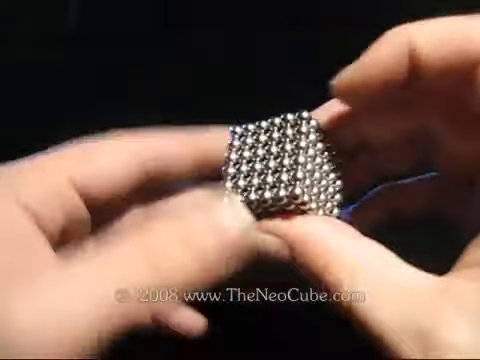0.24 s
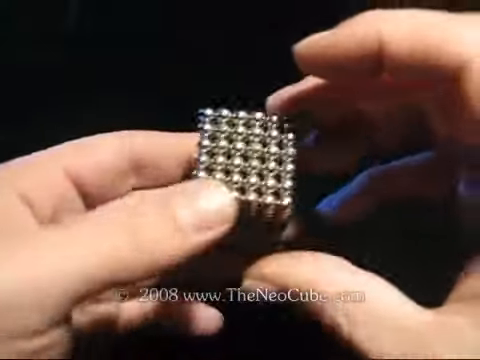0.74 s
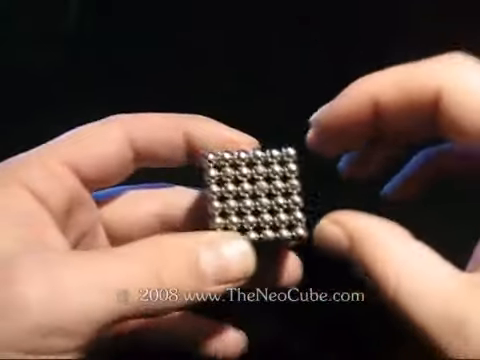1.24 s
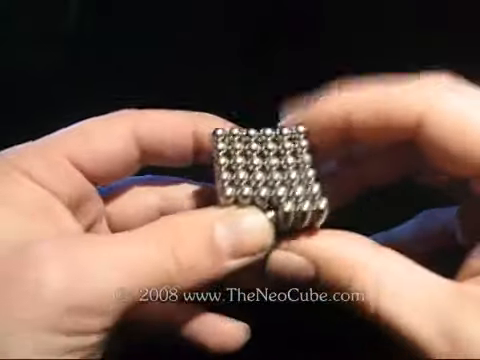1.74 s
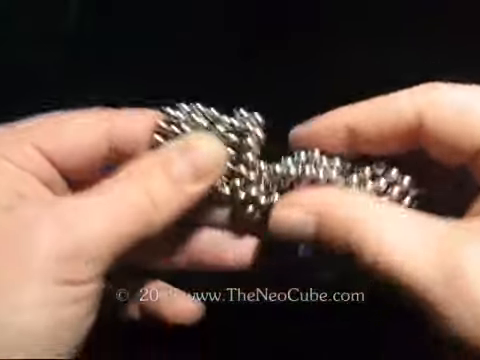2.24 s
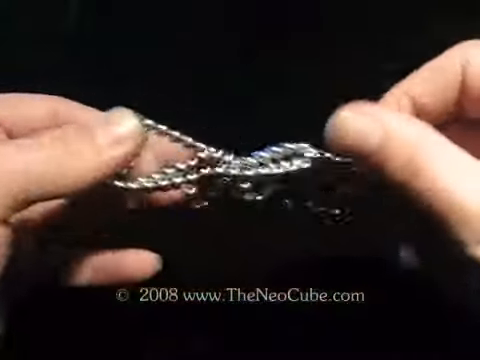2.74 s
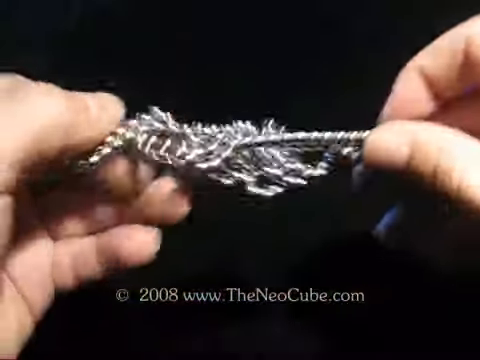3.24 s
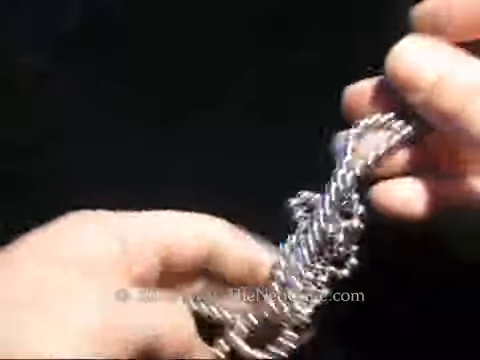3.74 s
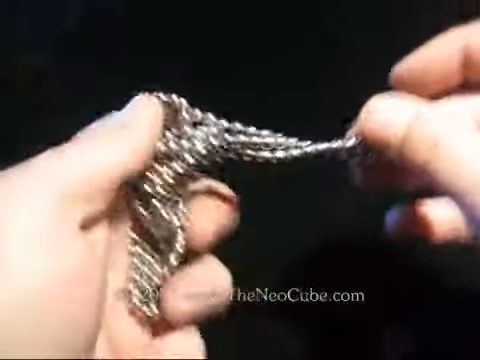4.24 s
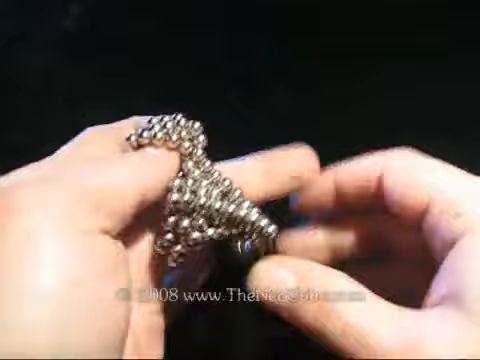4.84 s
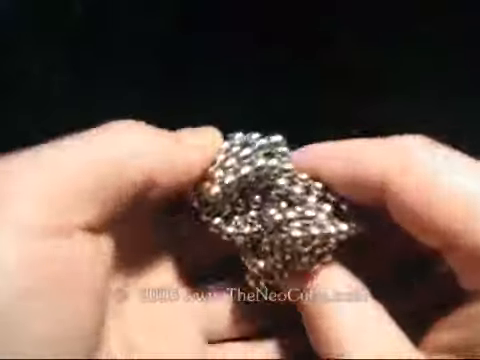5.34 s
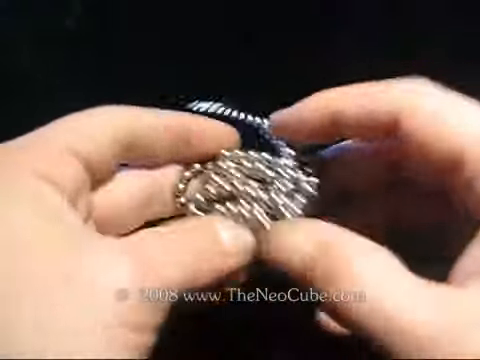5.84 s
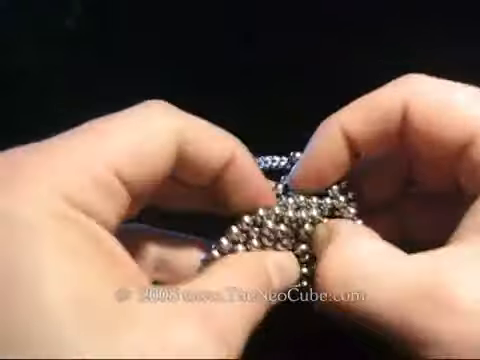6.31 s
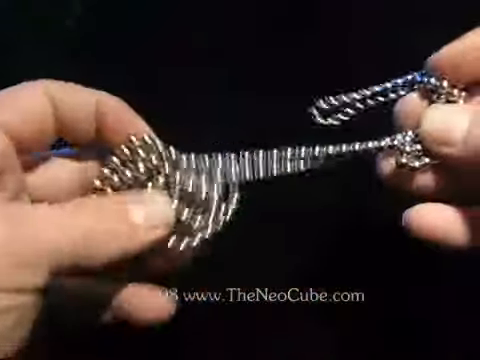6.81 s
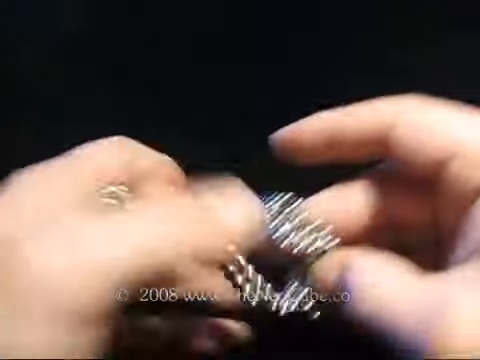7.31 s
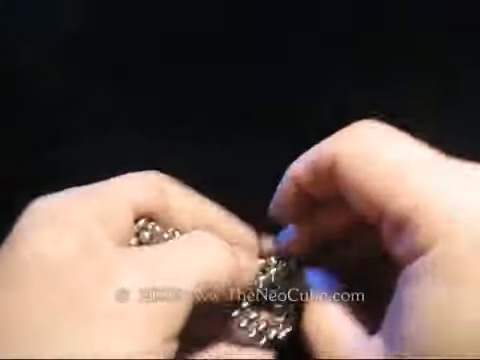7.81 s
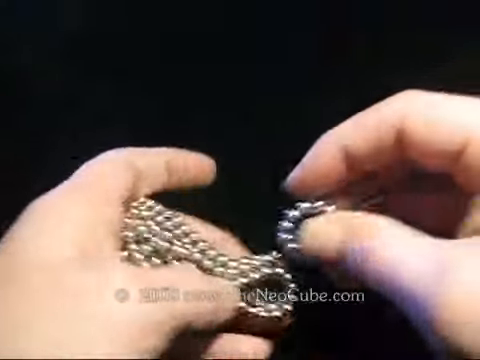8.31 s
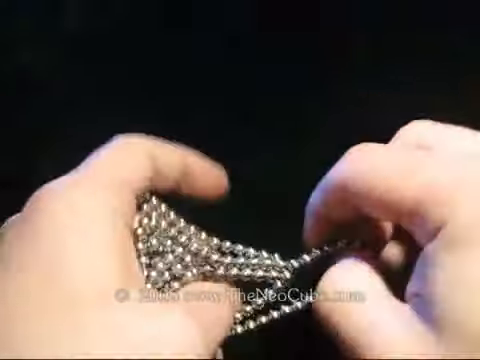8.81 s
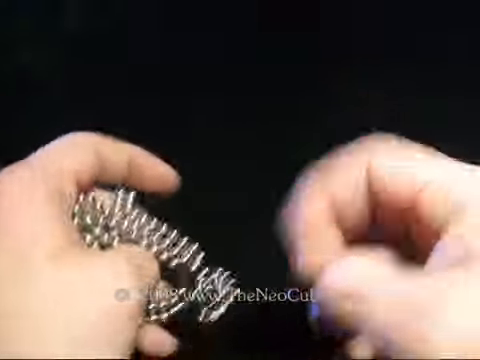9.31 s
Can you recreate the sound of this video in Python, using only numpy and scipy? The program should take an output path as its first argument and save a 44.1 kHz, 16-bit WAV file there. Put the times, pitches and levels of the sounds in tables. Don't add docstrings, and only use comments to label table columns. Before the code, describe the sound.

Low gritty room hum, then small steel magnetic balls snap sharply and tick in irregular bursts, thinning to sparse faint clicks over near silence.

```python
import sys
import numpy as np
from scipy import signal
from scipy.fft import rfft, irfft
from scipy.io import wavfile
from scipy.ndimage import uniform_filter1d

SR = 44100
rng = np.random.default_rng(int(sys.argv[2]) if len(sys.argv) > 2 else 0)


def undo_db(level):
    steps = np.asarray(level, float) / 20
    return 10 ** steps


def store_wav(level_fs):
    pcm = np.round(np.clip(np.atleast_2d(level_fs), -1, 1) * 32767)
    wavfile.write(sys.argv[1], SR, pcm.T.astype(np.int16))


N = 421596

# t/s, peak level/dB, ring f/Hz, thud in the hand re peak/dB, bright crack re peak/dB
TEAR_SNAPS = [(1.6696, -11, 1920, -11, -5), (1.6751, -16, 1290, -8, -6), (1.7147, -20, 1490, -14, -16),
              (1.7202, -15, 1140, -19, -16), (1.911, -16, 1780, -15, -8), (1.9151, -13, 2120, -16, -5),
              (1.9414, -16, 1920, -17, -13), (1.9467, -19, 2120, -16, -14), (1.9513, -19, 1810, -23, -17),
              (2.2449, -21, 1630, -17, -4), (2.2554, -15, 1580, -17, -11), (2.2754, -20, 1550, -17, -6),
              (2.6722, -15, 3320, -11, 2), (2.7013, -16, 2530, -25, -4), (2.7576, -9, 2980, -35, -7),
              (2.7638, -18, 2640, -20, -6), (2.8364, -18, 2030, -13, -11), (2.8726, -18, 2330, -23, -17)]
FOLD_SNAPS = [(3.0673, -18, 1780, -20, -8), (3.2864, -23, 2420, -17, -14), (3.2988, -13, 1650, -16, -10),
              (3.3056, -15, 2040, -18, -12), (3.3519, -15, 1910, -23, -21), (3.6009, -15, 1870, -19, -9),
              (3.6131, -16, 2100, -30, -12), (3.6325, -20, 2010, -29, -15), (3.831, -22, 1960, -19, -4),
              (3.8476, -23, 1920, -16, -9), (3.938, -8, 1900, -10, -3), (4.2656, -23, 1740, -15, -16),
              (4.3521, -19, 1710, -21, -9), (4.453, -23, 1710, -15, -4), (4.4619, -21, 1950, -25, -19),
              (4.581, -20, 1940, -21, -9), (4.6571, -14, 1780, -23, -18)]
KNEAD_SNAPS = [(5.4001, -23, 1460, -12, -9), (5.6878, -16, 1970, -21, -9), (5.6976, -22, 1570, -13, -9),
               (5.9866, -20, 1980, -23, -4), (6.0377, -21, 2250, -22, -8), (6.2868, -20, 1760, -13, -15),
               (6.3655, -19, 2790, -13, 2), (6.5027, -22, 2400, -21, -3), (6.5489, -21, 1550, -19, -11),
               (6.6334, -23, 2740, -11, -6), (6.6479, -23, 1960, -25, -13), (6.6734, -22, 2190, -19, -13),
               (7.308, -21, 2510, -18, -2), (7.5662, -23, 1900, -23, -9), (8.4781, -20, 2070, -24, -10),
               (8.533, -19, 2100, -32, -10), (8.9972, -23, 1650, -16, -2), (9.2286, -23, 2350, -18, -3),
               (9.4808, -23, 1490, -24, -19)]
# t/s, peak level/dB
TEAR_TICKS = [(2.1167, -32), (2.1583, -31), (2.2222, -30), (2.2601, -26), (2.2711, -27), (2.3132, -27),
              (2.3821, -30), (2.509, -30), (2.5263, -28), (2.5752, -24), (2.6305, -29), (2.6764, -26),
              (2.6914, -25), (2.6958, -24), (2.7975, -31), (3.1568, -30), (3.2405, -28), (3.3171, -25),
              (3.3468, -24), (3.3715, -27), (3.4723, -27), (3.4827, -28), (3.5681, -29), (3.6575, -28),
              (3.8374, -25), (4.0466, -32), (4.1228, -26), (4.1937, -24), (4.2035, -26)]
KNEAD_TICKS = [(4.2468, -27), (4.2904, -27), (4.3017, -25), (4.3097, -24), (4.315, -25), (4.4366, -27),
               (4.512, -29), (4.5555, -26), (4.7138, -31), (4.7374, -26), (4.7972, -32), (4.8279, -27),
               (4.9159, -27), (4.9406, -29), (5.151, -25), (5.2032, -31), (5.2801, -34), (5.5266, -25),
               (5.7233, -25), (5.7692, -24), (5.8662, -31), (5.9503, -28), (6.0098, -28), (6.057, -26),
               (6.1061, -26), (6.352, -27), (6.393, -26), (6.4435, -32), (6.458, -31), (6.5756, -26)]
PULL_TICKS = [(6.6035, -24), (6.6121, -24), (6.6897, -24), (6.7302, -24), (6.9732, -33), (7.0588, -29),
              (7.0793, -29), (7.2, -29), (7.6063, -28), (7.6839, -34), (7.7325, -29), (7.7551, -33),
              (7.8454, -28), (7.9539, -26), (7.9958, -24), (8.0794, -26), (8.1037, -26), (8.2125, -31),
              (8.784, -31), (8.8221, -26), (8.8332, -31), (8.9598, -32), (9.0102, -31), (9.0423, -27),
              (9.1512, -25), (9.1654, -25), (9.2786, -27), (9.3106, -31), (9.4314, -32), (9.5499, -34)]
# t/s, length/s, rustle level/dB
FLURRIES = [(1.906, 0.097, -58), (2.207, 0.13, -50.5), (2.477, 0.095, -50.5), (2.663, 0.093, -58),
            (2.75, .12, -55), (5.794, 0.054, -58), (3.2, 0.25, -54.5), (3.914, 0.046, -49.5),
            (4.19, 0.18, -53.5), (4.434, 0.016, -59), (4.495, .19, -60.5), (4.78, .17, -65),
            (5.109, 0.095, -67), (5.515, 0.054, -57.5), (5.666, 0.074, -50), (5.942, 0.11, -63.5),
            (6.346, 0.045, -42), (6.552, 0.3, -52), (6.673, 0.063, -45.5), (7.031, 0.06, -53),
            (7.295, 0.047, -60.5), (7.569, 0.065, -62), (7.709, 0.04, -59.5), (7.937, 0.21, -59.5),
            (8.504, 0.058, -62), (8.764, 0.094, -57), (8.953, 0.073, -54.5), (9.117, 0.061, -52.5),
            (9.212, 0.11, -53), (9.399, 0.14, -62)]
# t/s, length/ms
LULLS = [(1.994, 59), (4.754, 27), (4.994, 21), (5.021, 38), (5.089, 26), (5.161, 19), (5.288, 25),
         (5.326, 19), (5.889, 22), (6.46, 19), (6.776, 18), (6.794, 19), (6.83, 65), (6.925, 26),
         (6.951, 21), (6.99, 22), (7.096, 22), (7.254, 26), (7.426, 19), (7.456, 26), (7.531, 19),
         (7.691, 22), (7.792, 25), (7.824, 21), (7.865, 23), (8.187, 25), (8.259, 26), (8.618, 24),
         (8.856, 24), (8.934, 18)]


def unit(x):
    return x / np.sqrt(np.mean(x ** 2))


def band(x, lo_hz, hi_hz):
    return signal.sosfilt(signal.butter(2, [lo_hz, hi_hz], "bandpass", fs=SR, output="sos"), x)


def clicks(s, peak_db, ring_hz, thud_db, crack_db, jostle_db):
    lead, length = 256, 768
    t = (np.arange(length) - lead) / SR
    chance = rng.standard_normal((len(s), 4 + length))

    cycles = ring_hz[:, None] * t
    ring = np.cos(2 * np.pi * cycles + 2 * chance[:, :1])
    ring *= np.exp(-np.where(t < 0, (cycles / 0.65) ** 2, (np.abs(cycles) / 1.25) ** 1.3))

    crack = np.cos(2 * np.pi * 4900 * t + 2 * chance[:, 1:2]) * np.exp(-(t / 0.00019) ** 2)
    crack *= undo_db(crack_db + 2.5)[:, None]

    thud = np.cos(2 * np.pi * 520 * t + 2 * chance[:, 2:3]) * np.exp(-(t / 0.00065) ** 2)
    thud *= undo_db(thud_db + 5.5)[:, None]
    thud += undo_db(thud_db - 8)[:, None] * np.exp(-(t / 0.0021) ** 2)

    jostle = band(chance[:, 4:] ** 3, 820, 3300)
    jostle /= jostle.std(axis=1, keepdims=True)
    jostle *= np.where(t < 0, 1.1 * np.exp(t / 0.0015), np.exp(-t / 0.0031))
    jostle *= undo_db(jostle_db + 8.5)[:, None]

    shape = ring + crack + thud + jostle
    strength = np.sqrt(uniform_filter1d(shape ** 2, size=24, axis=1).max(axis=1))
    shape *= (undo_db(peak_db - 2.0) / strength)[:, None]
    out = np.zeros(N + length)
    np.add.at(out, (s * SR).astype(int)[:, None] + np.arange(length), shape)
    return out[lead:N + lead]


def strong_snaps():
    s, peak_db, ring_hz, thud_db, crack_db = np.r_[TEAR_SNAPS, FOLD_SNAPS, KNEAD_SNAPS].T
    jostle_db = -10 + 0.3 * thud_db + 0.33 * crack_db
    return clicks(s, peak_db, ring_hz, thud_db, crack_db, jostle_db)


def lesser_ticks():
    # t/s, peak level/dB
    flurry_ticks = [(1.9563, -29), (2.2814, -28), (2.3182, -29), (2.8582, -30), (3.3583, -29),
                    (3.3779, -30), (4.2526, -27), (4.3483, -30), (4.3557, -29), (4.4474, -30),
                    (4.4566, -30), (4.6642, -29), (5.6816, -26), (5.7369, -29), (6.0459, -30),
                    (6.3557, -27), (6.3599, -25), (6.3789, -30), (6.6625, -29), (6.6981, -26),
                    (6.7066, -28), (6.7128, -26), (6.7249, -25), (6.7497, -27), (6.7613, -30), (7.047, -32),
                    (7.6183, -34), (7.949, -30), (8.0393, -33), (8.0719, -29)]
    s, peak_db = np.r_[TEAR_TICKS, KNEAD_TICKS, PULL_TICKS, flurry_ticks, slips()].T
    chance = rng.standard_normal((len(s), 4)).T
    ring_hz = 1980 * np.exp(0.2 * chance[0])
    variety_db = 4 * chance[1:]
    thud_db, crack_db, jostle_db = np.array([[-20.], [-10.], [-19.]]) + variety_db
    return clicks(s, peak_db, ring_hz, thud_db, crack_db, jostle_db)


def slips():
    slips_per_s, most = 130, 28
    over_rustle_db, scatter_db = 14, 4.5
    start, length, db = np.transpose(FLURRIES)[:, :, None]
    chance = rng.random((len(start), most, 2))
    when, size = chance[..., 0], chance[..., 1]
    after = (np.arange(most) + when) / slips_per_s
    scatter = np.log(size / (1 - size)).clip(-4, 2) / 2
    peak_db = db + over_rustle_db + scatter_db * scatter
    peak_db = peak_db - 200 * (after > length)
    return np.c_[(start + after).clip(0, N / SR - 1 / SR).ravel(), peak_db.ravel()]


def lull_ticks():
    start, ms = np.transpose(LULLS)
    s = np.r_[start - 0.001, start + ms / 1000 + 0.001]
    every = np.ones(len(s))
    return clicks(s, peak_db=-44.0 * every, ring_hz=1292.0 * every, thud_db=-8.5 * every,
                  crack_db=2.5 * every, jostle_db=-16.0 * every)


def rustle():
    knocks_per_s, hands_start_s, calm_db, edge_s = 900, 1.72, -63.5, 0.015
    when, size, sign = rng.random((3, N))
    knocks = (when < knocks_per_s / SR) * undo_db(-3.0 * np.log(1 - size)) * np.sign(sign - 0.5)
    t = np.arange(N) / SR
    busy = (t > hands_start_s) * undo_db(calm_db)
    for s, length, db in FLURRIES:
        inside = np.minimum(t - s, s + length - t)
        busy += undo_db(db) * np.clip(0.5 + inside / edge_s, 0, 1)
    grip = np.repeat(rng.standard_normal(N // 400 + 1), 400)[:N]
    busy *= undo_db(2.6 * uniform_filter1d(grip, size=200))
    return busy * (unit(band(knocks, 1200, 2900)) + undo_db(-8.0) * unit(band(knocks, 300, 6500)))


def room():
    # f/Hz, level per Hz/dB
    tone = [(15, -38.5), (40, -12), (62, -11.5), (100, -5.5), (190, -15), (300, -11.5), (450, -19),
            (900, -21), (3000, -29), (7000, -33.5)]
    # f/Hz, rms level/dB, wobble width/Hz
    hum = [
        (74.7, -41, 4),
        (149.4, -50, 6),
        (236, -56, 12),
        (282, -56, 12),
        (847, -63, 8),
        (3404.6, -59.5, 4),
    ]
    hz, db = np.transpose(tone)
    f = np.fft.rfftfreq(N, 1 / SR)
    colour = undo_db(np.interp(np.log(f + 1), np.log(hz), db))
    out = undo_db(-41.5) * unit(irfft(rfft(rng.standard_normal(N)) * colour, N))
    for line_hz, line_db, width_hz in hum:
        resonance = 1 / (1 + ((f - line_hz) / (width_hz / 2)) ** 2)
        wobble = unit(irfft(rfft(rng.standard_normal(N)) * resonance, N))
        steady = np.sqrt(2) * np.sin(2 * np.pi * line_hz * np.arange(N) / SR)
        out += undo_db(line_db) * (0.9 * steady + 0.3 * wobble)
    return out


def camera_gain():
    # t/s, level/dB
    gain = [(0, 0.5), (1.66, 1), (1.74, -11), (1.9, -2), (2.02, -19), (2.15, -7.5), (2.4, -12), (2.6, -2.5),
            (2.9, -11), (3.25, -5.5), (4.1, -10.5), (4.7, -18), (6.3, -14), (6.85, -18), (9.56, -15.5)]
    s, db = np.transpose(gain)
    return undo_db(np.interp(np.arange(N) / SR, s, db))


def background():
    hush_db, hush_s, lead_s, lull_db = -4, 0.014, 0.0045, -18
    still = np.zeros(N)
    for table in TEAR_SNAPS[1:], FOLD_SNAPS, KNEAD_SNAPS, TEAR_TICKS, KNEAD_TICKS, PULL_TICKS:
        for s, *_ in table:
            still[int((s - lead_s - hush_s) * SR):int((s - lead_s) * SR)] = hush_db
    for s, ms in LULLS:
        still[int(s * SR):int((s + ms / 1000) * SR)] = lull_db
    return undo_db(uniform_filter1d(still, size=44)) * (rustle() + camera_gain() * room())


def scene():
    return (lesser_ticks() + lull_ticks() + strong_snaps() + background())[None]


def low_pass(x):
    return signal.sosfilt(signal.butter(12, 17000, fs=SR, output="sos"), x)


def record(dry):
    hold, step = 4, 1 / 128
    smooth = signal.sosfilt(signal.butter(2, 6500, fs=SR, output="sos"), dry)
    steps = np.round(smooth[:, ::hold] / step - 0.12) * step
    held = np.repeat(steps, hold, axis=1)[:, :N]
    power = uniform_filter1d(uniform_filter1d(held ** 2, size=500), size=1100)
    haze = np.repeat(rng.standard_normal(N // hold + 1), hold)[:N]
    haze *= np.repeat(undo_db(-15 * np.abs(rng.standard_normal(N // 512 + 1))), 512)[:N]
    held = held + undo_db(-14.5) * np.sqrt(np.clip(power, undo_db(-125), undo_db(-59))) * haze
    mix = signal.sosfiltfilt(signal.ellip(6, 0.2, 30, 16000, fs=SR, output="sos"), held)
    return low_pass(mix)


dry = scene()
out = record(dry)
store_wav(out)
```